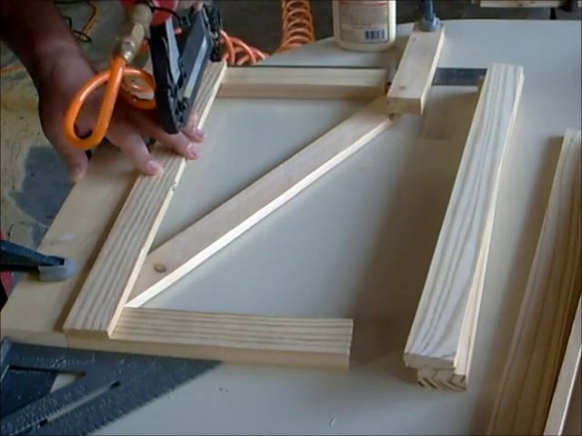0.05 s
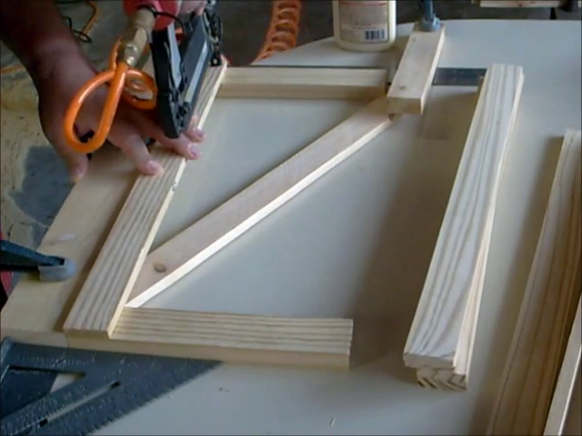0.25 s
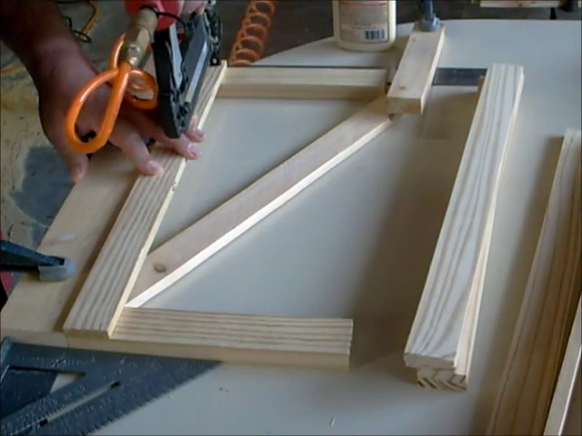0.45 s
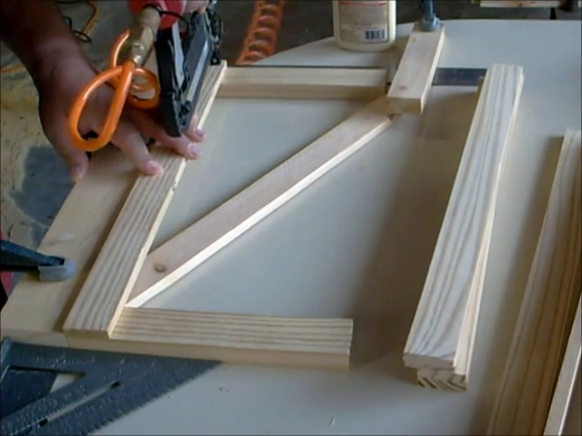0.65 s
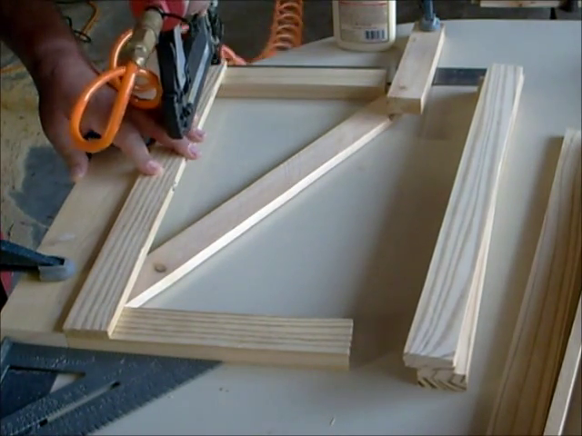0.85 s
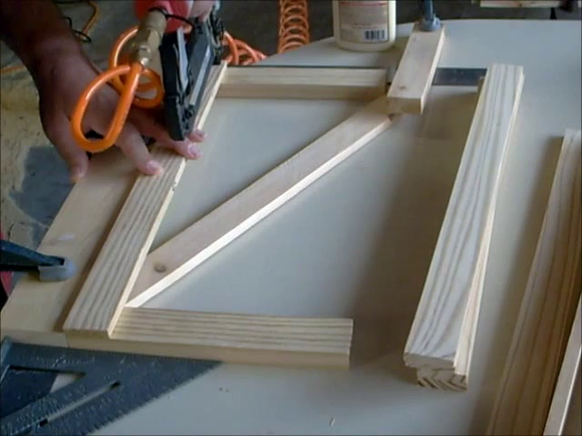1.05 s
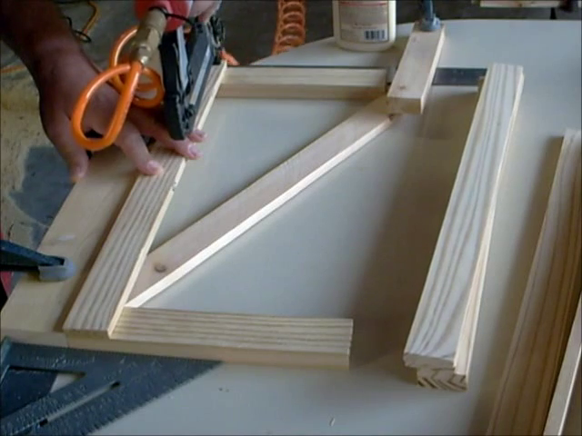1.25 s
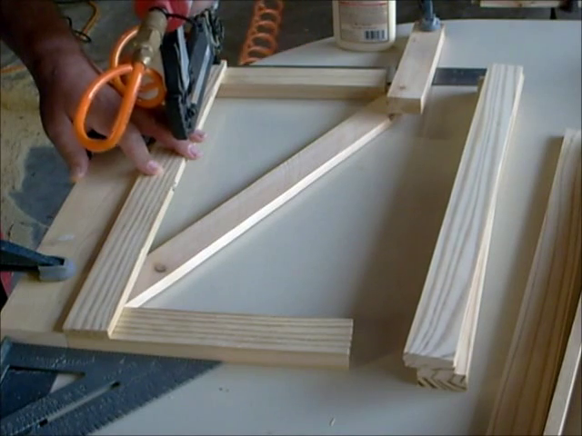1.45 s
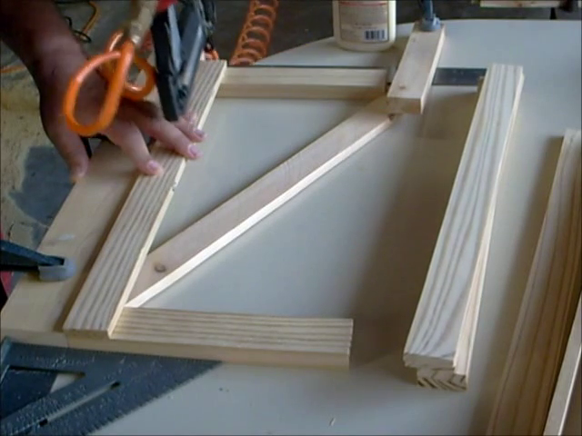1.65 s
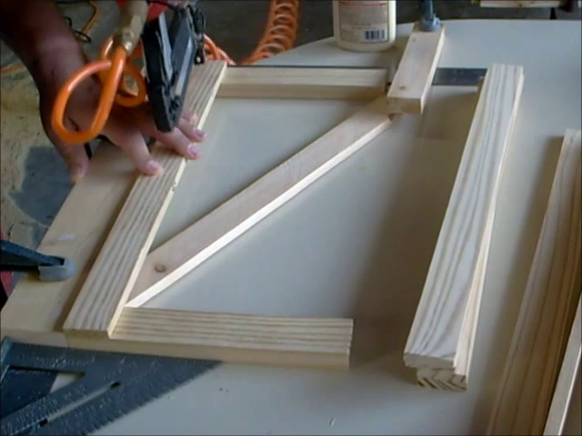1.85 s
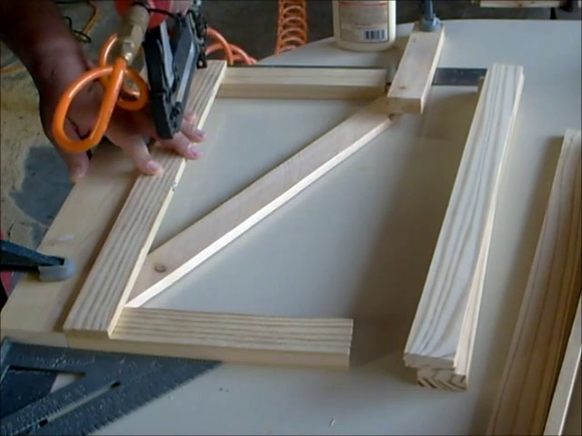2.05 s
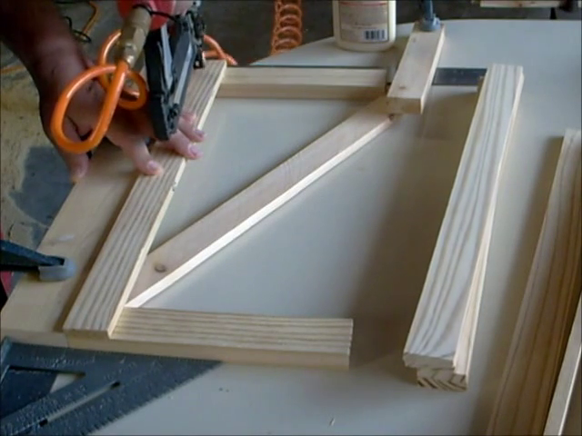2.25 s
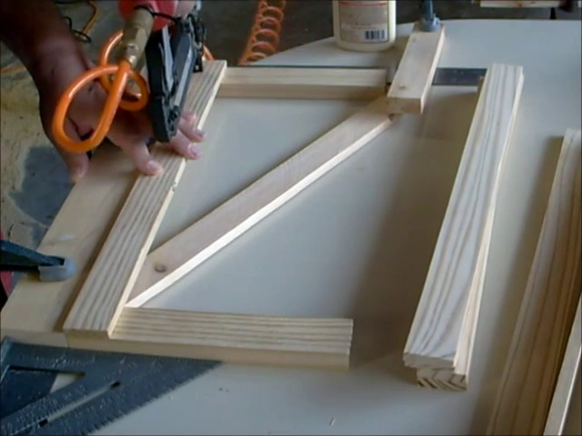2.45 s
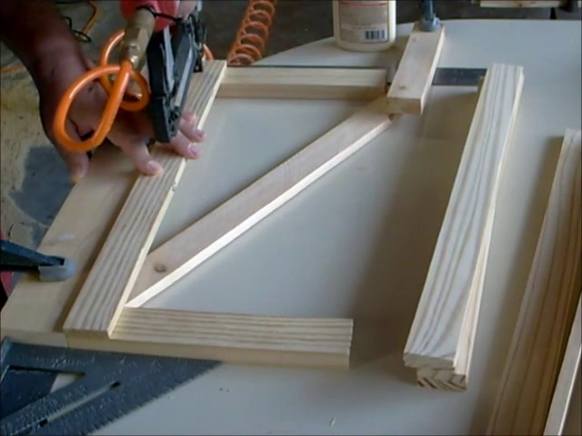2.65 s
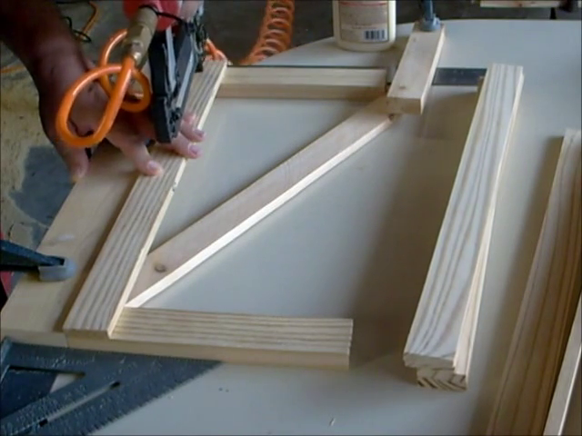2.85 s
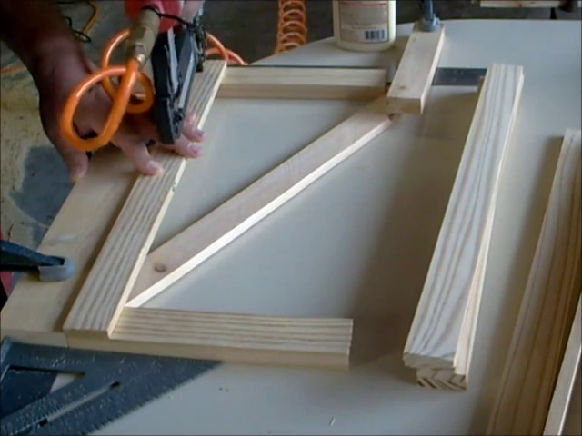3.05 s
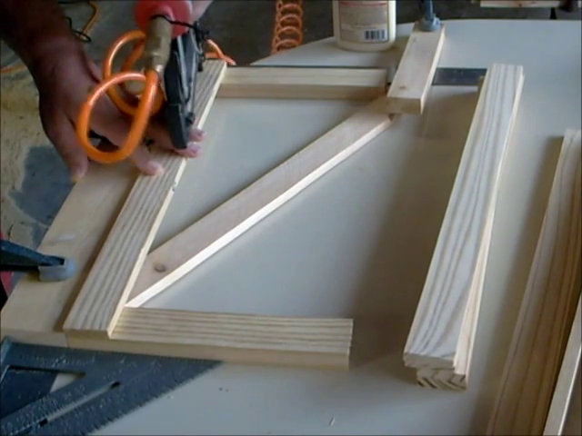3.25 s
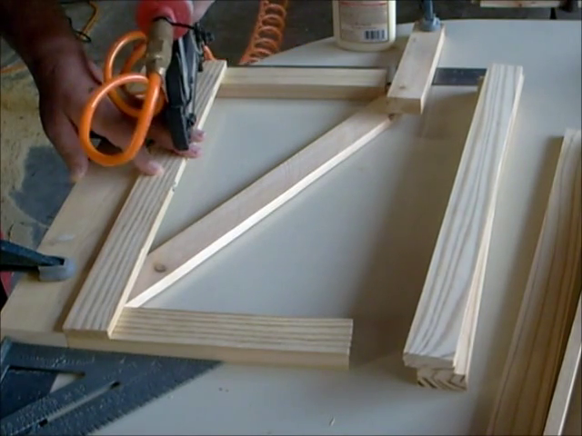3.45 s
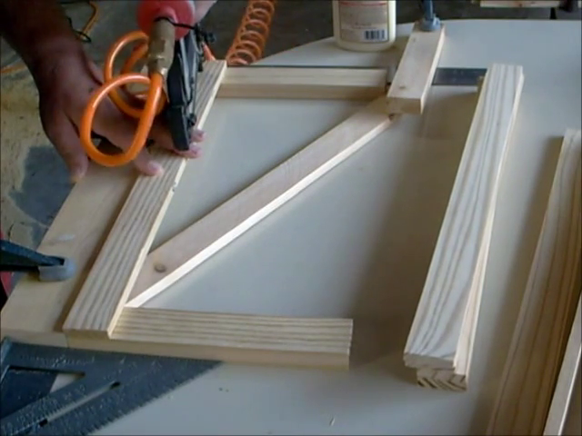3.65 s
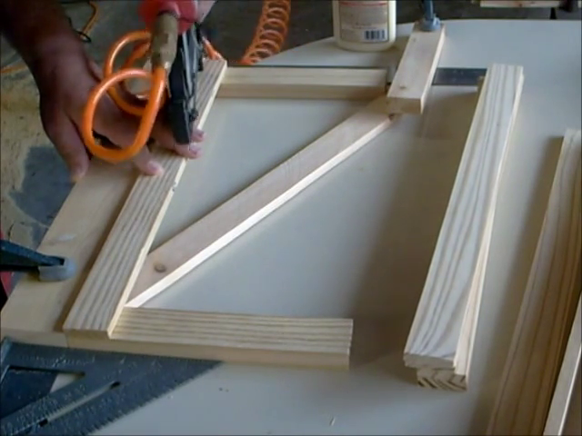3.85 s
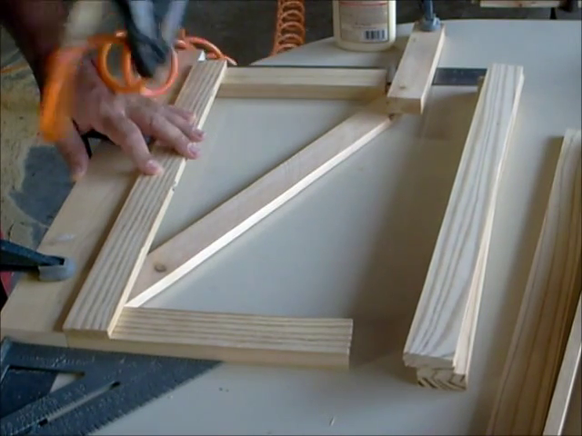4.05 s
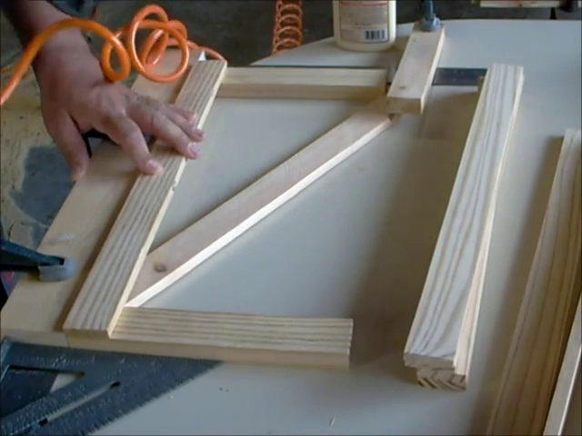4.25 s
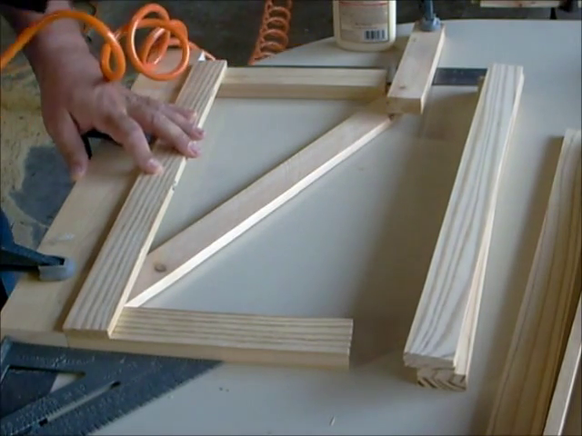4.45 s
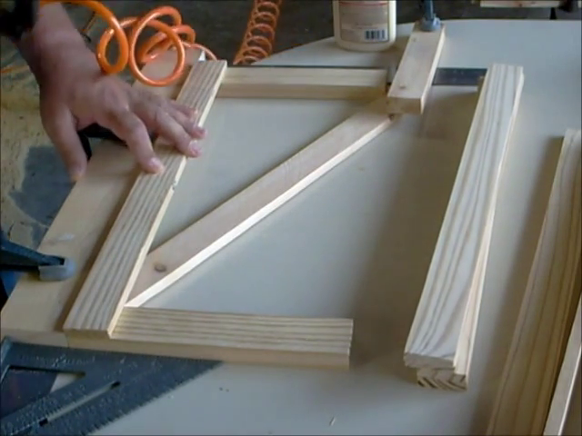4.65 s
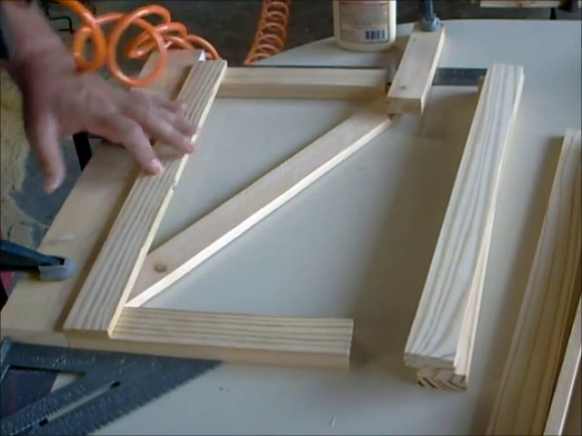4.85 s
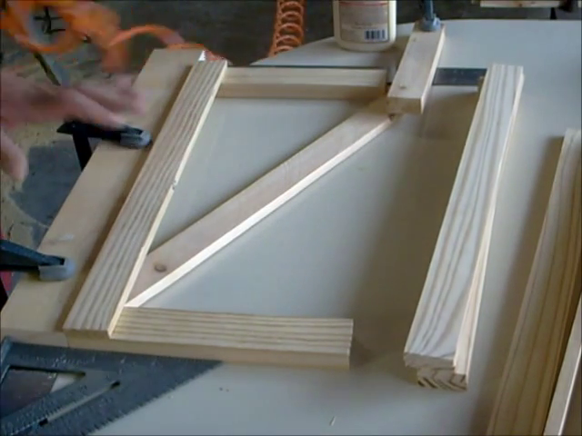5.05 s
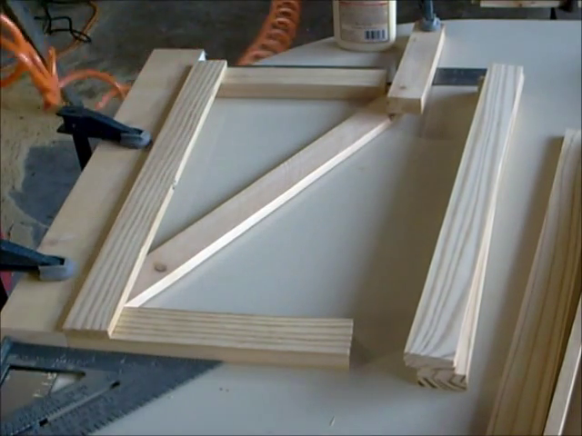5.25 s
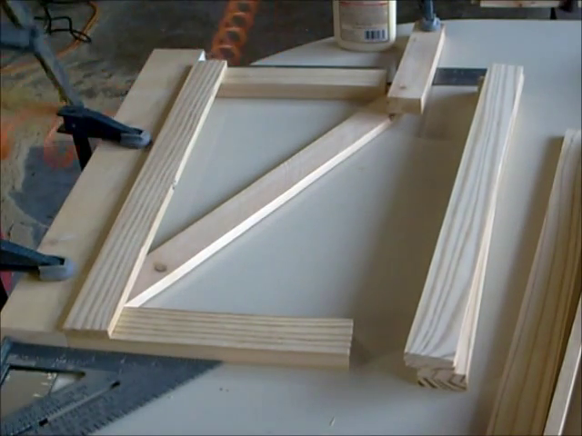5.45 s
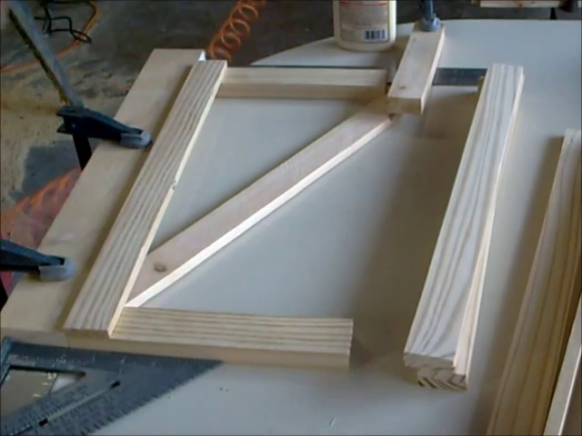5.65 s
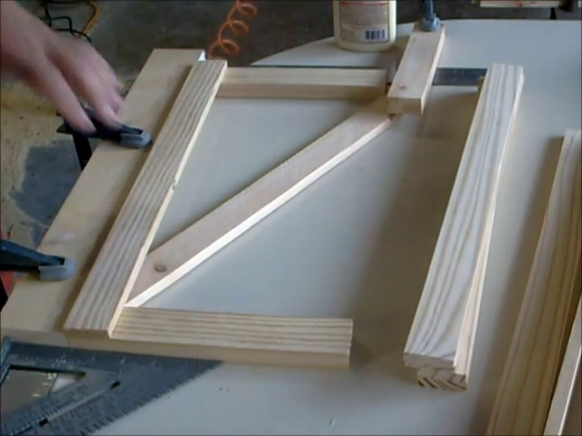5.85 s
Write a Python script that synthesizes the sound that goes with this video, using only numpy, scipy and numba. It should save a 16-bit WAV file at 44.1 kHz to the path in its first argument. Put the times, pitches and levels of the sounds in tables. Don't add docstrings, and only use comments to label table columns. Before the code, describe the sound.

A quiet workshop with faint, steady air noise, heard through a cheap microphone that rings near 3 kHz. Around 0.2 s a cluster of small clicking taps of tool and hose on wood, more at 0.55 s and a firmer one at 0.99 s. At 1.42 s a tiny trigger tick and short hiss lead into a very loud, hard nailer blow at 1.44 s; exhaust puffs at about 1.55 s, and the flattened, crackling roar dies away over roughly half a second. Light touches near 2.43 s. From about 2 s a distant car's tyre hum swells, sinking in pitch, nearest around 4.4 s. The second shot hits at 3.69 s, with less low push and a more ringing slat, exhaust around 3.8 s and a similar roar. At 4.45 s a tap and sliding scuff; faint rubbing follows, then the strongest hose-and-clamp scrape at 5.43 s, a short pull at 5.72 s and a last scuff at 5.89 s.

```python
import sys
import numpy as np
from scipy import signal
from scipy.fft import rfft, irfft, next_fast_len
from scipy.io import wavfile
from scipy.ndimage import uniform_filter1d
from numba import njit

SR = 44100
rng = np.random.default_rng(int(sys.argv[2]) if len(sys.argv) > 2 else 0)


def store_wav(level_fs):
    pcm = np.round(np.clip(np.atleast_2d(level_fs), -1, 1) * 32767)
    wavfile.write(sys.argv[1], SR, pcm.T.astype(np.int16))


def ratio(d):
    e = np.asarray(d, float) / 20
    return 10 ** e


N = 260172
T = np.arange(N) / SR


def curve(rows):
    s, *columns = np.transpose(rows)
    return [np.interp(T, s, c) for c in columns]


def white():
    return rng.standard_normal(N)


def noise(points):
    hz, db = np.transpose(points)
    f = np.arange(N // 2 + 1) * SR / N + 1
    gain = ratio(np.interp(np.log(f), np.log(hz), db))
    x = irfft(rfft(white()) * gain, N)
    return x / x.std()


@njit
def band(x, hz, width_hz):
    y, b, l = np.empty(len(x)), 0., 0.
    for i in range(len(x)):
        g, k = np.tan(np.pi * hz[i] / SR), width_hz / hz[i]
        v = (b + g * (x[i] - l)) / (1 + g * (g + k))
        b, l, y[i] = 2 * v - b, l + 2 * g * v, k * v
    return y


def resonance(x, hz, width_hz):
    return band(x, np.full(N, 1. * hz), 1. * width_hz)


def cut(x, hz, kind, order=4):
    return signal.sosfilt(signal.butter(order, hz, kind, fs=SR, output="sos"), x)


def split(x, hz):
    return signal.sosfiltfilt(signal.butter(3, hz, "high", fs=SR, output="sos"), x)


def walk(rate_hz):
    k = int(SR / rate_hz)
    steps = np.repeat(rng.standard_normal(N // k + 1), k)
    x = uniform_filter1d(uniform_filter1d(steps, k), k)[:N]
    return x / x.std()


def burst(start_s, rise_s, t60_s, t=T):
    age = np.maximum(t - start_s, 0)
    return (1 - np.exp(-age / rise_s)) * np.exp(-np.log(1000) * age / t60_s)


def sine(hz, start_s, t=T):
    return np.sin(2 * np.pi * hz * (t - start_s))


# hz, level_db [dB per Hz]
HALL_COLOUR = [(18, -44), (30, -7), (64, -11), (102, -3.5), (190, -8), (260, -5.5), (450, -8.5),
               (750, -2.5), (1150, -3.5), (2380, -10), (3250, -1.5), (4100, -19), (5200, -27),
               (10800, -28.5)]
# time_s, level_db
HALL_LEVEL = [(0.0, -55), (5.9, -52)]


def hall():
    return ratio(curve(HALL_LEVEL)[0] + 0.58 * walk(1.7)) * noise(HALL_COLOUR)


# centre_hz, width_hz, gain_db
PORT_MODES = [(3165, 140, 10), (2964, 370, -1.5), (4082, 85, 5.5)]


def port(x):
    return x + sum(ratio(db) * resonance(x, hz, width_hz) for hz, width_hz, db in PORT_MODES)


# hz, level_db [dB per Hz]
ROOM_COLOUR = [(35, -72.5), (60, -36.5), (189, -42), (239, -24.5), (338, -24), (736, -19), (1130, -12),
               (1290, -15.5), (1410, -12), (2310, -11.5), (3130, -5.5), (4930, -23), (10500, -49),
               (13600, -83.5), (22000, -120)]


def room_air():
    return port(noise(ROOM_COLOUR))


# start_s, peak_db, ring_hz, knock_db
TOUCHES = [(0.172, -36.5, 3060, -4), (.181, -29, 3170, -28), (0.1831, -23.5, 3000, -11.5),
           (.187, -19, 2840, -14), (.193, -39, 2830, -9), (0.198, -41, 2950, -8), (0.2304, -41, 2850, -9),
           (.224, -40, 2900, -10), (0.2446, -31, 2900, -15), (.4524, -43, 3300, -13),
           (0.5519, -26, 3070, -23), (0.558, -34, 3020, -15), (0.606, -33, 2990, -14),
           (.9680, -31.5, 3280, -17), (0.9897, -31, 3220, -25), (0.991, -21, 3010, -23),
           (2.42, -43.5, 3200, -17), (2.4362, -35.5, 2963, -21), (4.44, -37, 3233, -16),
           (4.4662, -44.5, 3140, -19), (4.7202, -50, 3165, -5.5), (5.885, -43.5, 3194, -12.5)]
# hz, level_db [dB per Hz]
CRACK_COLOUR = [(800, -42), (1800, -11), (3100, 7.5), (4500, -10.5), (7000, -26), (10500, -30),
                (13000, -55)]
# start_s, level_db, t60_s
SLIDES = [
    (2.4362, -43, 0.018),
    (4.4646, -35, 0.19),
    (5.886, -40.5, .12),
]
TAP_T60_S = 0.012
CRACK_DB, CRACK_GROWTH = -47.5, 0.78


def taps():
    out, rasp, room = np.zeros(N), noise(CRACK_COLOUR), room_air()
    for s, peak_db, ring_hz, knock_db in TOUCHES:
        near = slice(int(s * SR), int((s + .5) * SR))
        t = T[near]
        ring = burst(s, 0.0004, TAP_T60_S, t) * sine(ring_hz, s, t)
        knock = ratio(knock_db) * burst(s, 0.0012, 0.022, t) * sine(920, s, t)
        crack_db = CRACK_DB + CRACK_GROWTH * (peak_db + 40.5)
        crack = ratio(crack_db) * burst(s, 0.00055, 0.012, t) * rasp[near]
        trace = ratio(-35.0) * burst(s, 0.0013, 0.22, t) * room[near]
        out[near] += ratio(peak_db + 1.5) * (ring + knock + trace) + crack
    scuff = sum(ratio(db) * burst(s, 0.0017, t60_s) for s, db, t60_s in SLIDES)
    return out + rasp * scuff


# valve_s, blow_s, piston_return_s
SHOT_TIMES = [
    (1.417, 1.4444, 1.559),
    (3.668, 3.6915, 3.82),
]
# push_db, echo_gap_db, exhaust_db, slat_hz, slat_db
SHOT_FORCES = [
    (-3.5, -11.5, -20.5, 1700, -21),
    (-17, -7.5, -18.5, 2080, -12),
]
# hz, level_db [dB per Hz]
AIR_COLOUR = [(120, -63), (200, -21), (541, -29.5), (1050, -15.5), (2070, -24.5), (3030, 3.5), (4220, -13),
              (4740, -15), (5150, -18), (10500, -23), (13600, -56.5), (22000, -120)]
TRIGGER_LEAD_S, ECHO_LAG_S, EXHAUST_LEAD_S = .008, 0.012, 0.022
VALVE_DB = -17


def nailer():
    air, puff, wood = noise(AIR_COLOUR), cut(white(), 3800, "high", order=2), white()
    out = 0
    for (valve, blow, back), force in zip(SHOT_TIMES, SHOT_FORCES):
        push_db, _, exhaust_db, slat_hz, slat_db = force
        trigger, echo, exhaust = valve - TRIGGER_LEAD_S, blow + ECHO_LAG_S, back - EXHAUST_LEAD_S
        tick = ratio(-34.0) * burst(trigger, 0.00046, .015)
        hiss = ratio(VALVE_DB + 10.5) * burst(valve, 0.0082, 0.075) * (T < blow + .004)
        vent = ratio(exhaust_db) * burst(exhaust, .006, 2.)
        vent = vent * np.exp(-np.maximum(T - back, 0) / 0.012)
        slat = ratio(slat_db + 15.5) * burst(echo, 0.00067, 0.7) * resonance(wood, slat_hz, 300)
        push = -ratio(push_db + 14.5) * burst(blow, 0.00052, 0.0043) * sine(760, blow)
        crash = ratio(push_db + 1) * burst(blow + 0.00091, 0.00038, 0.68)
        crash = crash * np.exp(-np.maximum(T - blow - .005, 0) / 0.0014)
        bench_thud = ratio(push_db - 29.5) * burst(blow, 0.006, .06) * sine(320, blow)
        out = out + (tick + hiss + crash) * air + vent * puff + slat + push + bench_thud
    return out


EXHAUST_FILL_S = 0.033


def stored(blow, exhaust, blow_db, exhaust_db, t60_s):
    from_blow = ratio(blow_db) * burst(blow, .0001, t60_s)
    from_exhaust = ratio(exhaust_db) * burst(exhaust, EXHAUST_FILL_S, t60_s)
    return np.hypot(from_blow, from_exhaust)


CEILING_DB, KNEE = -8.5, 1.5


def roar():
    air = room_air()
    air = air / air.std()
    bass, treble = air - split(air, 2200), split(air, 5400)
    out = 0
    for (_, blow, back), force in zip(SHOT_TIMES, SHOT_FORCES):
        exhaust, gap = back - EXHAUST_LEAD_S, ratio(force[1])
        mid = stored(blow, exhaust, blow_db=15.7, exhaust_db=14.24, t60_s=.56)
        low = stored(blow, exhaust, blow_db=20.1, exhaust_db=2.4, t60_s=0.71)
        high = stored(blow, exhaust, blow_db=12, exhaust_db=17, t60_s=0.53)
        gain = ratio(CEILING_DB) / (1 + mid ** (2 * KNEE)) ** (.5 / KNEE)
        gate = gap * burst(blow, .001, 22) + (1 - gap) * burst(blow + ECHO_LAG_S, .0012, 99)
        out = out + gate * gain * (mid * air + (low - mid) * bass + (high - mid) * treble)
    return out


# time_s, height_db, length_ms
LONG_OVERLOADS = [
    (1.4466, 3.3, 2.9),
    (1.5729, 4, 1.6),
    (3.6927, 3, 3.2),
    (3.8272, 5, 1.5),
]
# time_s, height_db
SHORT_SWELLS = [(1.4584, 1.1), (1.4881, 2.5), (1.4987, 2.5), (1.5159, 2.5), (1.5225, 4.5), (1.5341, 4.5),
                (1.5582, 7.5), (1.5848, 2.5), (1.592, 3), (1.6004, 3), (1.602, 2), (1.6189, 2.2),
                (1.6457, 2.5), (3.7108, 3.5), (3.7365, 4), (3.7688, 1.54), (3.7786, 1), (3.8353, 2.5),
                (3.8453, 3), (3.8632, 2.5), (3.8755, 2.5), (3.8878, 1), (3.8954, 2.5), (3.9059, 2)]
SWELL_MS = .6


def swell(x):
    z = signal.hilbert(x, next_fast_len(N))[:N]
    size = np.abs(z) + 1e-9
    want = size / (1 + (size / .97) ** 6) ** (1 / 6)
    for s, db, ms in LONG_OVERLOADS + [(s, db, SWELL_MS) for s, db in SHORT_SWELLS]:
        near = slice(int((s - .008) * SR), int((s + .008) * SR))
        share = np.exp(-np.abs((T[near] - s) * 1000 / ms) ** 3)
        want[near] += share * (ratio(db) - want[near])
    return z.real * want / size


CAR_NEAREST_S, CAR_DB, CAR_WIDTH_S, CAR_HEARD_S = 4.385, -43.5, .36, 1.9
HUM_HZ, HUM_SAG_HZ_PER_S, HUM_END_HZ = 847, 73, 678.6


def car():
    db = CAR_DB - 10 * np.log10(1 + ((T - CAR_NEAREST_S) / CAR_WIDTH_S) ** 2)
    hz = np.maximum(HUM_HZ - HUM_SAG_HZ_PER_S * (T - CAR_HEARD_S), HUM_END_HZ)
    low_hum = ratio(2 * walk(3.8)) * band(white(), hz, 86.0)
    high_hum = ratio(-7.5 + 2 * walk(2.3)) * band(white(), 1.7 * hz, 180.0)
    tyres = ratio(-6.5) * band(band(white(), 1.1 * hz, 950.0), 0.74 * hz, 2000.0)
    fade_in = np.clip((T - CAR_HEARD_S) / .5, 0, 1)
    return fade_in * ratio(db + 16) * cut(low_hum + high_hum + tyres, 2600, "low")


# loudest_s, level_db, rise_db_per_s, fall_db_per_s
PULLS = [
    (4.47, -47, 248, 39),
    (5.05, -55.5, 30, 18),
    (5.29, -47.5, 140, 34),
    (5.426, -32.5, 184, 85),
    (5.72, -47.5, 170, 227),
]
# hz, level_db [dB per Hz]
RUB_COLOUR = [(530, -61), (900, -31.5), (1050, -26.5), (1200, -19), (1300, -14.5), (1760, -14.5),
              (2590, -10), (3090, 3), (4080, -11.5), (4430, -15.5), (10500, -46), (13600, -69),
              (22000, -120)]
CREST_S = 0.0197


def drag():
    slips = (rng.random(N) < 600 / SR) * ratio(1.8 * rng.exponential(size=N))
    grain = 8.0 + signal.lfilter([1], [1, -np.exp(-1 / (0.0086 * SR))], slips)
    power = 0
    for s, db, rise, fall in PULLS:
        distance_s = np.hypot(T - s, CREST_S) - CREST_S
        power = power + ratio(db - np.where(T < s, rise, fall) * distance_s) ** 2
    pull = power ** .5
    rub = noise(RUB_COLOUR)
    bright = np.clip(uniform_filter1d(pull, size=3000, origin=-1400) / pull, .3, 1.6)
    rub = rub + (bright - 1) * split(rub, 4800)
    return pull * rub * grain / np.sqrt(np.mean(grain ** 2))


def scene():
    shots = swell(roar() + nailer())
    return (hall() + taps() + shots + car() + drag())[None]


def band_limit(x):
    return signal.sosfilt(signal.butter(12, 16000, fs=SR, output="sos"), x)


TOP_HZ = 11650
LEAK_DB = -11


def record(dry):
    past = np.maximum(np.abs(dry) - .8, 0)
    flat = dry - np.sign(dry) * (past - .4 * past ** 2 - .1 * np.tanh(past / .1))
    flip = 1.3 * np.clip((-dry - 1.05) / 0.38, 0, 1)
    flip = 2 * flip * (np.arange(N) % 2)
    limit = signal.cheby2(10, 40, TOP_HZ, fs=SR, output="sos")
    dull = signal.sosfiltfilt(limit, flat + flip)
    run = np.clip(uniform_filter1d(flip, size=130) / .15, 0, 1) ** 2
    leak = ratio(LEAK_DB) * run * cut(flip, (TOP_HZ, 15000), "band")
    return band_limit(np.clip(ratio(-0.4) * dull + leak, -1, 1))


dry = scene()
out = record(dry)
store_wav(out)
```